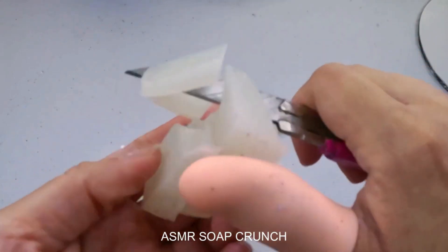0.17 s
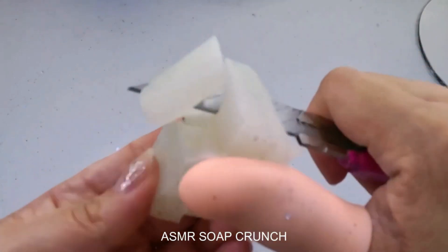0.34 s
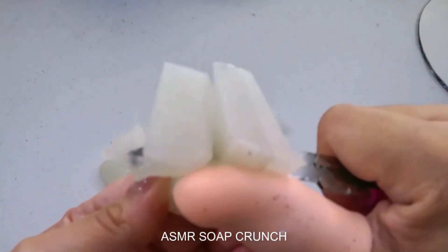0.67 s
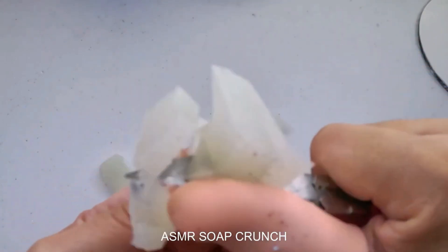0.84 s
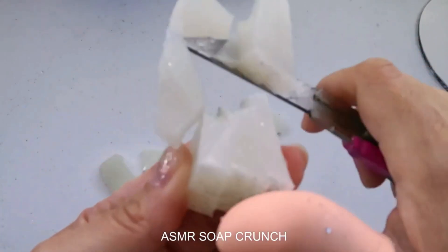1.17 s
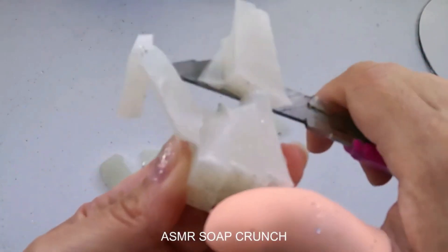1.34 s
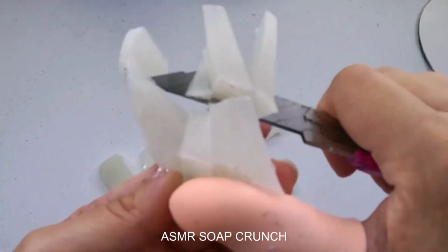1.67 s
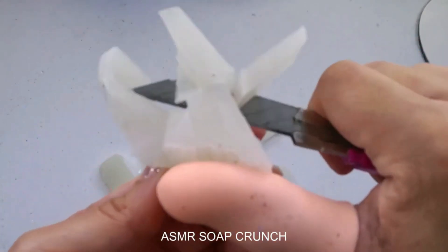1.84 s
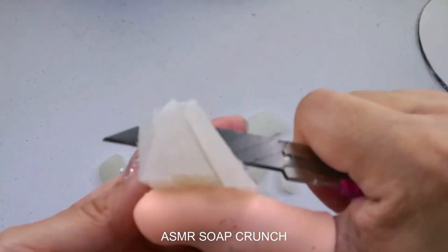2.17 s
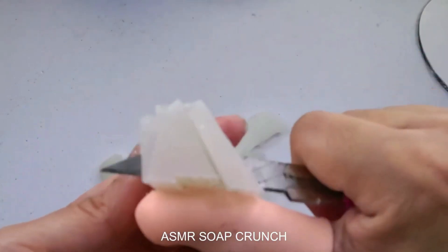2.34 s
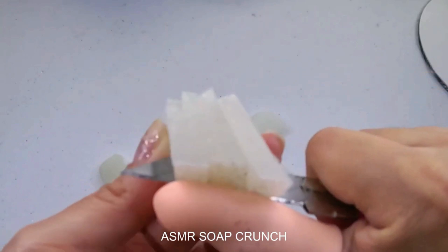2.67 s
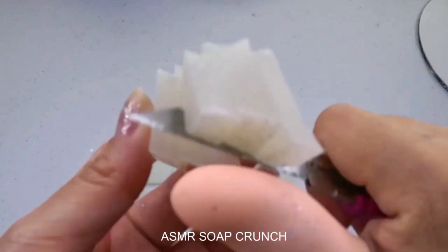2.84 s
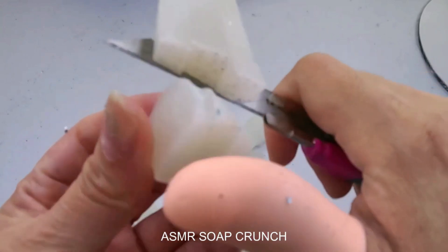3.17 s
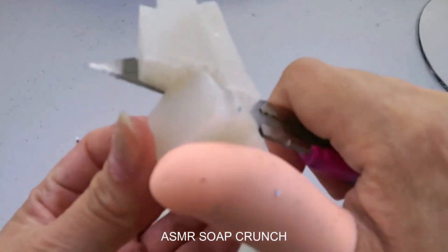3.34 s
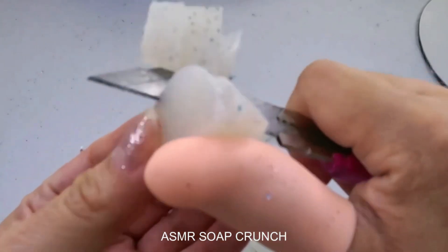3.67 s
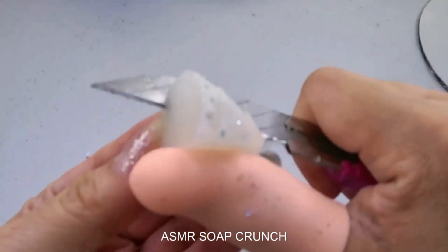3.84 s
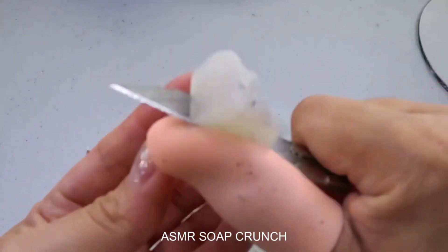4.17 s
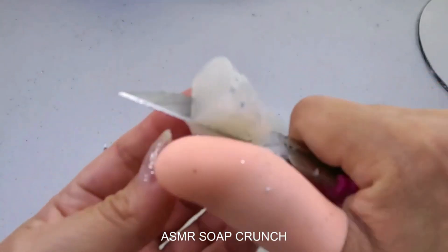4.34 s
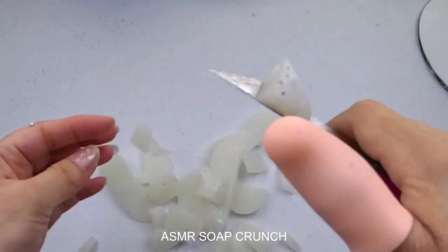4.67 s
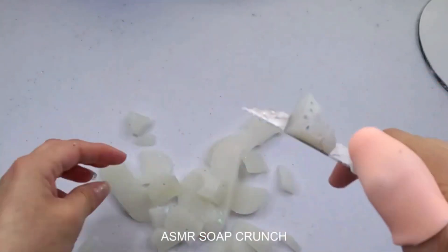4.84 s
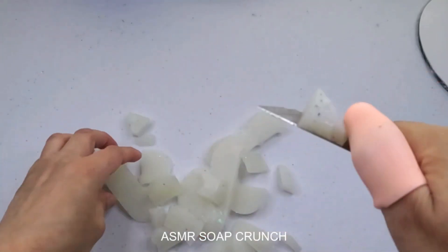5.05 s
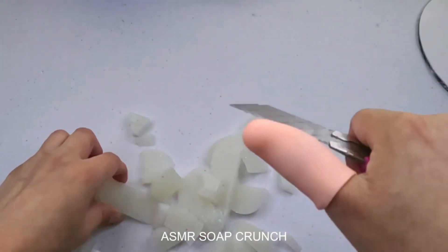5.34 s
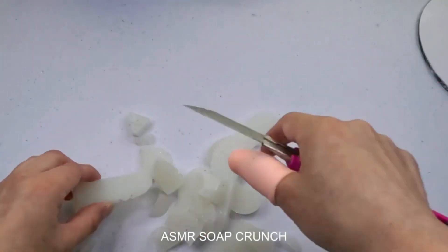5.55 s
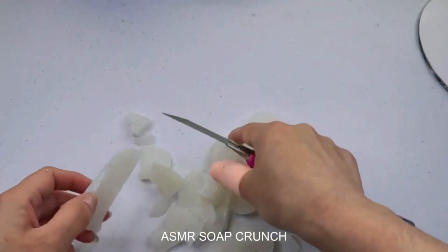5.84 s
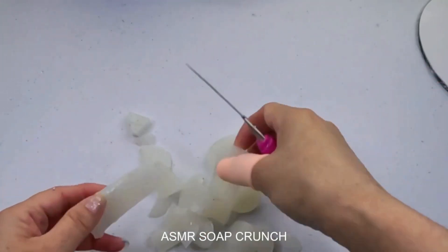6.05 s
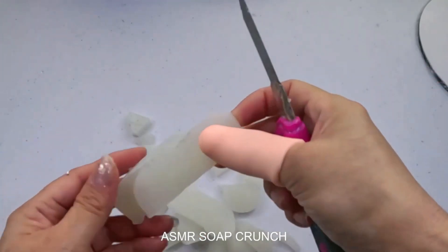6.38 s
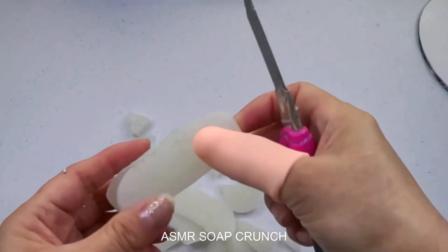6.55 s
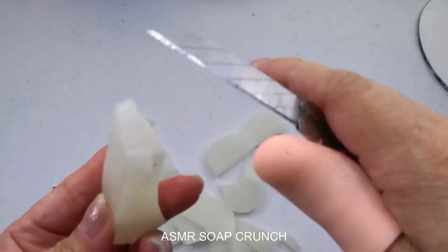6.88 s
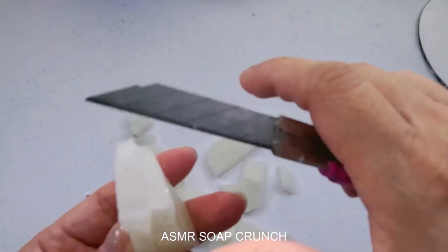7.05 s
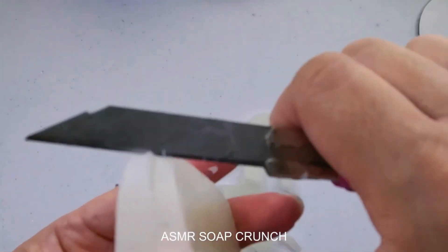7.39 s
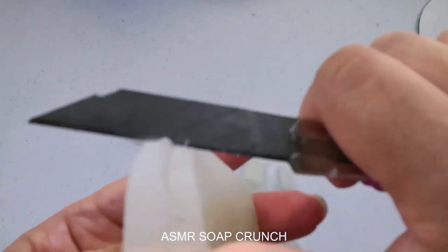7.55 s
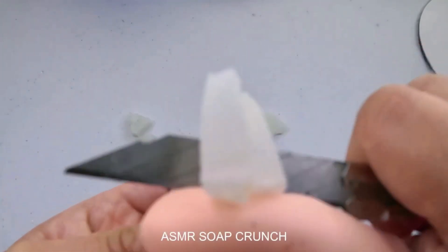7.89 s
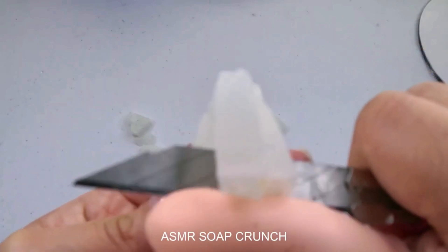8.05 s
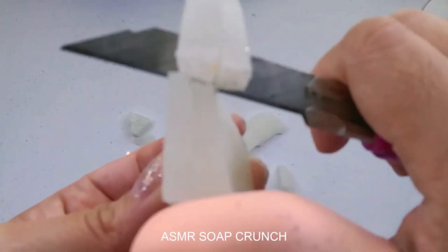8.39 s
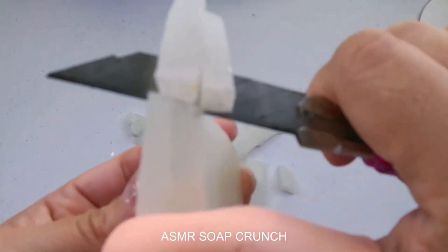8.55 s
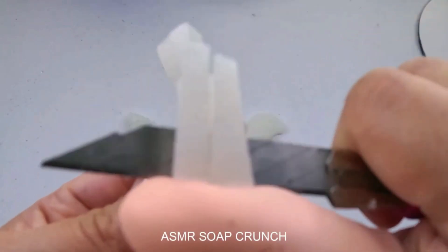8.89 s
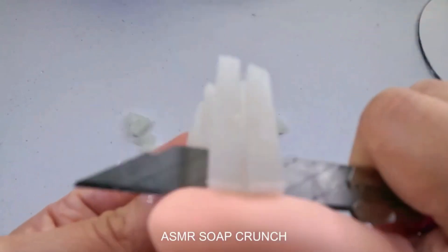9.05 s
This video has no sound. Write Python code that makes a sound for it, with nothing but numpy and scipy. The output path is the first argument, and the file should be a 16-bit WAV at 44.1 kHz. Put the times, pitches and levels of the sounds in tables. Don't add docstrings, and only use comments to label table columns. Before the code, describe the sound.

A low wavering traffic hum fills a small room. Over it come sharp dry snaps of tacky soap parting from a blade. Several heavy drops slam the hollow table, overloading the close microphone, followed by bounces and clacks. The background sinks after each blow and steadily climbs back. Later a hand shoves soap pieces with scrapes, chatter and thuds before light cutting resumes and one last piece drops.

```python
import sys
import numpy as np
from scipy import signal
from scipy.fft import rfft, irfft, next_fast_len
from scipy.io import wavfile

SR = 44100
rng = np.random.default_rng(int(sys.argv[2]) if len(sys.argv) > 2 else 0)


def volts_from_decibels(level):
    exponent = np.asarray(level, float) / 20
    return 10 ** exponent


def master(y):
    cut = np.clip(np.atleast_2d(y).T, -1, 1)
    pcm = np.round(cut * 32767)
    wavfile.write(sys.argv[1], SR, pcm.astype(np.int16))


N = 406602


def rms_one(x):
    return x / np.sqrt(np.mean(x ** 2) + 1e-20)


def in_time(rows):
    s, *columns = np.transpose(rows)
    return [np.interp(np.arange(N) / SR, s, column) for column in columns]


def while_on(rows, fade_s):
    start, end = rows[0][0], rows[-1][0]
    return np.interp(np.arange(N) / SR, [start - fade_s, start, end, end + fade_s], [0, 1, 1, 0])


def at_hz(points, hz):
    table_hz, values = np.array(points)[:, :2].T
    return np.interp(np.log(hz), np.log(table_hz), values)


def drift(rate):
    r = np.exp(-80 * np.pi * rate / SR)
    slow = signal.lfilter([1], [1, -2 * r, r * r], rng.standard_normal(N // 40 + 2002))[2000:]
    return np.interp(np.arange(N) / 40, np.arange(len(slow)), rms_one(slow))


def coloured(x, spectrum):
    size = next_fast_len(N)
    hz = np.arange(1, size // 2 + 2) * SR / size
    (low_hz, low_db), (high_hz, high_db) = spectrum[0], spectrum[-1]
    closed = [(low_hz / 2, low_db - 40)] + list(spectrum) + [(high_hz * 2, high_db - 40)]
    return rms_one(irfft(rfft(x, size) * volts_from_decibels(at_hz(closed, hz)), size)[:N])


def ring(clicks, hz, t60):
    r, w = volts_from_decibels(-60 / (t60 * SR)), 2 * np.pi * hz / SR
    return signal.lfilter([0, np.sin(w)], [1, -2 * r * np.cos(w), r * r], clicks + 1e-18)


def grains(per_s, spread_db):
    sizes = volts_from_decibels(spread_db * np.minimum(rng.exponential(1, N), 5)) * rng.choice([-1, 1], N)
    return sizes * (rng.random(N) < per_s / SR)


def place(times, peaks_db, sounds):
    out = np.zeros(N + sounds.shape[1])
    for s, peak_db, sound in zip(times, peaks_db, sounds):
        out[round(s * SR):][:len(sound)] += volts_from_decibels(peak_db) * sound / np.abs(sound).max()
    return out[:N]


def strokes(rows, rise_db_per_s, fall_db_per_s):
    t = np.arange(0, N + 32, 32) / SR
    gain = 0
    for s, held, db in rows:
        rise_db = rise_db_per_s * np.maximum(s - t, 0)
        fall_db = fall_db_per_s * np.maximum(t - s - held, 0)
        gain = gain + volts_from_decibels(db - rise_db - fall_db)
    return np.interp(np.arange(N) / SR, t, gain)


def struck(modes, times, peaks_db, contact_s, vary_db, crunch_s, crumble, size):
    chance = rng.standard_normal((len(times), len(modes)))
    fade = np.exp(-np.arange(size) / (crunch_s * SR)) * np.sqrt(2 / (crunch_s * SR))
    out = 0
    for k, (hz, mode_db, t60) in enumerate(modes):
        push = crumble * fade * rng.standard_normal((len(times), size))
        push[:, 0] += 1 - crumble
        out = out + volts_from_decibels(mode_db + vary_db * chance[:, k:k + 1]) * ring(push, hz, t60)
    soft = signal.butter(2, .4 / contact_s, fs=SR, output="sos")
    return place(times, peaks_db, signal.sosfilt(np.vstack([soft, soft]), out))


def snaps(times, peaks_db, low_hz, high_hz, decay_s):
    t, noise = np.arange(2048) / SR, rng.standard_normal((len(times), 2048))
    band = signal.butter(3, [low_hz, high_hz], "band", fs=SR, output="sos")
    onset = 1 - np.exp(-t / 0.00022)
    decay = np.exp(-t / decay_s) + .12 * np.exp(-t / (6 * decay_s))
    return place(times, peaks_db, signal.sosfilt(band, noise * onset * decay))


def ducking():
    from_db, share, recover_db_per_s, lag_s = -19.5, 0.35, 13, 0.077
    t, depth = np.arange(N) / SR, np.zeros(N)
    for s, *levels_db in DROPS + SHOVES:
        depth[round(s * SR)] = share * max(max(levels_db) - from_db, 0)
    held = np.maximum.accumulate(depth + recover_db_per_s * t) - recover_db_per_s * t
    r = np.exp(-1 / (lag_s * SR))
    return -signal.lfilter([1 - r], [1, -r], held)


# (f/Hz, level/dB per Hz)
DEEP = [(8.8, -33), (15, -5), (27, -8), (54, 3.5), (86, -5.5), (100, -16.5), (130, -14), (220, -120)]
RUMBLE = [(50, -17.5), (85, -13.5), (108, -3), (135, -3), (173, -6.5), (255, -10), (392, -19), (456, -28.5),
          (515, -26), (800, -57), (1040, -65), (1760, -120)]
TYRES = [(410, -19.5), (700, -1.5), (848, -6.5), (1020, 2.5), (1340, 1), (1630, -1), (1890, -7),
         (2800, -19.5), (3640, -52), (6160, -120)]
HISS = [(1470, -17.5), (2500, -3), (3020, 4), (3220, 2.5), (3680, -1), (7080, 2), (8420, -4.5),
        (14500, -19.5), (15900, -38), (16400, -38)]
# (t/s, level/dB)
TRAFFIC = [(0, -3), (.7, -0.5), (1.4, 1.5), (2.3, 2.5), (3.3, -2), (3.9, 1), (5.5, 2.5), (7.3, -2),
           (8.5, 1.5), (9.22, -0.5)]
# (t/s, level/dB)
GUSTS = [
    (0.698, -30.5),
    (3.9, -38.5),
    (5.5, -32.5),
    (8.35, -34),
    (9.0, -36.5),
]
# (t/s, held/s, level/dB)
PASSES = [
    (1.65, 0.2, -48),
    (3.75, 0.35, -54.5),
    (7.2, .6, -51.5),
]


def street_noise(duck_db):
    t, busy = np.arange(N) / SR, volts_from_decibels(in_time(TRAFFIC)[0])
    gusts = sum(volts_from_decibels(db) * np.exp(-((t - s) / 0.23) ** 2) for s, db in GUSTS)
    passing = strokes(PASSES, 14.5, 14.5)
    deep_gain = np.hypot(volts_from_decibels(-38.5), gusts)
    rumble_gain = volts_from_decibels(-29) * busy
    tyres_gain = np.hypot(volts_from_decibels(-53) * busy, passing)
    hiss_gain = volts_from_decibels(-63 + 0.29 * duck_db) * busy
    noise = 0
    for spectrum, gain, flicker_db in [(DEEP, deep_gain, 0.71), (RUMBLE, rumble_gain, 0.47),
                                       (TYRES, tyres_gain, 1.0), (HISS, hiss_gain, 1.0)]:
        flicker = volts_from_decibels(flicker_db * drift(10))
        noise = noise + gain * flicker * coloured(rng.standard_normal(N), spectrum)
    whine = rms_one(ring(rng.standard_normal(N), 7060, .1))
    return noise + hiss_gain * volts_from_decibels(-15) * whine


def tone(rows, wobble_hz, half_db):
    out = while_on(rows, fade_s=0.056)
    on = out > 0
    hz, level_db = in_time(rows)
    turn = 2 * np.pi * np.cumsum((hz + wobble_hz * drift(3))[on]) / SR
    level = np.sqrt(2) * volts_from_decibels((level_db + 2.6 * drift(6.3))[on])
    out[on] *= level * (np.sin(turn) + volts_from_decibels(half_db) * np.sin(turn / 2))
    return out


# (t/s, f/Hz, level/dB)
ENGINE_NEAR = [(0, 120, -40), (.8, 122.1, -29.5), (1.25, 119.8, -34), (2.2, 119, -20), (2.8, 117.7, -27.5),
               (3.2, 114.4, -21), (3.94, 113.5, -19), (4.85, 109.6, -24), (5.7, 108, -30)]
ENGINE_FAR = [(0, 137.5, -34), (.51, 139, -26), (1.05, 139, -30.5), (1.5, 139, -27.5), (2.199, 140.2, -33),
              (2.701, 138.5, -26), (3.199, 138, -38.5), (3.95, 138, -28.5)]
ENGINE_LATE = [(6.72, 125.1, -41), (6.8, 127.6, -28.5), (7.3, 128, -29.5), (7.87, 125.9, -32),
               (8.74, 122.8, -31), (8.93, 123, -19), (9.19, 119.7, -39.5)]
ENGINE_FADING = [(6.72, 123.7, -44), (6.8, 123.1, -29.5), (7.3, 121, -36), (7.8, 119.6, -31.5),
                 (8.0, 118.1, -52)]


def engines():
    passing = [ENGINE_NEAR, ENGINE_FAR, ENGINE_LATE, ENGINE_FADING]
    return sum(tone(rows, wobble_hz=0.38, half_db=-20.0) for rows in passing)


# (start t/s, loudest t/s, end t/s, f/Hz, level/dB)
DRONES = [
    (0, 0.79, 1.624, 248, -33.5),
    (1.85, 1.5, 2, 249, -26.5),
    (2.6, 3.3, 3.95, 250.3, -31.5),
    (7.2, 9, 8.9, 248, -34),
    (0, 1.21, 1.9, 313, -32),
    (2.85, 2, 3.95, 312, -37),
    (2.9, 3.44, 3.95, 193.2, -36),
    (3.3, 3.5, 4.3, 377, -41),
]


def drones():
    swell_db = 11.5
    out = 0
    for start, top, end, hz, db in DRONES:
        rows = [(start, hz, db - swell_db), (top, hz, db), (end, hz, db - swell_db / 2)]
        out = out + tone(rows, wobble_hz=1.472, half_db=-18.0)
    return out


def growl():
    band = signal.butter(4, [400, 610], "band", fs=SR, output="sos")
    level = strokes([(1.6, 0, -44.5)], rise_db_per_s=6, fall_db_per_s=12)
    return level * volts_from_decibels(0.63 * drift(7.1)) * rms_one(signal.sosfilt(band, rng.standard_normal(N)))


def street():
    duck_db = ducking()
    return volts_from_decibels(duck_db) * (street_noise(duck_db) + engines() + drones() + growl())


# (t/s, dull level/dB, bright level/dB)
TICKS = [(.177, -55, -47.5), (0.9455, -37, -23), (.983, -51, -35), (1.1308, -50, -37), (1.1797, -49.5, -45),
         (1.2188, -34, -40), (1.5692, -31, -33.5), (1.84, -47, -33.5), (1.897, -42.5, -36),
         (2.775, -59, -26), (2.804, -30, -22.5), (2.8354, -46, -39), (2.9577, -61, -41), (2.9755, -57, -30),
         (2.945, -56, -39), (8.232, -45, -45), (4.324, -50, -33.5), (4.376, -22.5, -17), (4.481, -42, -41),
         (4.776, -38, -52), (5.3143, -32, -46), (5.4766, -32.5, -37), (4.862, -35, -60), (5.28, -46, -52),
         (5.642, -37, -46), (7.0694, -49, -37), (7.4695, -39, -65), (8.1466, -36.5, -35), (8.311, -36, -33),
         (8.5654, -39, -43.5), (8.998, -29, -38), (4.457, -50, -50), (1.2195, -38, -60), (9.201, -36, -50),
         (9.213, -34, -24), (3.31, -40, -50), (5.688, -50, -44)]


def ticks():
    s, dull_db, bright_db = np.transpose(TICKS)
    dull = snaps(s, dull_db, low_hz=1900, high_hz=4600, decay_s=0.0022)
    bright = snaps(s, bright_db - 1.5, low_hz=5400, high_hz=10800, decay_s=0.0018)
    return dull + bright


# (t/s, held/s, level/dB)
SLIDES = [(.945, 0.014, -50.5), (1.14, 0.1, -54.5), (1.52, 0.063, -64), (1.84, 0.18, -61.5),
          (2.78, 0.057, -53.5), (2.94, 0.14, -63.5), (3.31, 0.021, -62), (3.69, .03, -59.5),
          (4.0, 0.028, -59), (4.37, 0.062, -56), (4.71, 0.13, -65), (6.23, 0.012, -64), (6.78, 0.07, -59.5),
          (7.06, 0.066, -62), (7.88, .02, -58.5), (8.14, 0.054, -59.5), (8.23, 0.13, -58.5),
          (8.75, 0.036, -60), (8.87, 0.031, -57), (5.305, 0.035, -60), (5.48, 0.02, -63)]
# (f/Hz, level/dB per Hz)
TACK = [(2500, 2), (4500, -3), (6500, 1.5), (9000, 2), (11000, -7), (14000, -33), (16000, -32)]


def crackle():
    slips = grains(per_s=3700, spread_db=0.0) * volts_from_decibels(3.2 * drift(30))
    return coloured(slips, TACK) * strokes(SLIDES, 397, 241.5)


# (t/s, held/s, level/dB)
SMEARS = [
    (1.21, .02, -53),
    (1.57, 0.015, -51.5),
    (2.98, 0.033, -55),
    (3.325, 0.022, -45),
    (4.38, 0.015, -52),
    (4.88, .03, -52),
]


def smears():
    return rms_one(ring(grains(per_s=1300, spread_db=3.5), 2970, 0.0019)) * strokes(SMEARS, 900, 500)


# (t/s, table boom level/dB, knock level/dB, clack level/dB, crack level/dB)
DROPS = [(2.271, -31.5, -42, -30, -55), (2.2776, 0, -8, -40.5, -41), (2.283, -9.5, -19, -12, -36),
         (2.302, 0, -30, -24.5, -36.5), (2.351, -9, -15, -21.5, -38), (2.403, -23, -18, -16, -40),
         (3.311, -18, -31, -38, -43), (3.9943, -22, -40, -34, -48), (3.999, -3, -12, -27, -40),
         (4.036, -5, -15, -24, -50), (4.185, -20.5, -43, -46.5, -66), (4.325, -7, -41, -48, -52),
         (4.8715, -3, -13, -10, -7), (4.886, -3, -29.5, -18, -45), (4.899, -19, -21, -37, -20),
         (4.936, -25, -24.5, -33, -42), (4.984, -28, -29, -23.5, -34.5), (5.025, -17, -38, -37, -56),
         (9.211, -10, -29, -31, -31), (9.2165, -11, -24.5, -27, -28)]
SHOVES = [(5.236, -7.5, -47, -26, -34.5), (5.363, -11, -50, -35, -60), (5.531, -33, -47, -33, -57),
          (5.339, -30, -50, -34, -45), (5.55, -18, -39.5, -31, -51), (5.5602, -3, -20, -9, -15),
          (5.598, -7, -43, -44.5, -60), (5.617, -3, -13.5, -27, -43), (5.676, -8, -24, -31, -42),
          (5.722, -22, -18, -16.5, -43.5), (6.059, -15, -22, -34, -70), (6.074, -15, -30, -40, -66),
          (6.094, -10.5, -35, -36, -70), (6.104, -12.5, -33, -34, -64), (6.202, -16, -35, -54, -60),
          (6.318, -23, -61, -39, -67), (6.338, -4.5, -59, -41, -52), (6.3548, -4, -27, -10, -43),
          (6.377, -3, -22, -37, -49), (6.404, 2.5, -9.5, -13, -22), (6.442, -7, -7, -7.5, -32)]


def landings():
    s, *levels_db = np.transpose(DROPS + SHOVES)
    return s + .001, *levels_db


# (f/Hz, level/dB, t60/s)
TABLE = [(110, -23.5, 0.17), (165.8, 4, 0.2), (185, -18, 0.36), (215.3, -1.5, 0.13), (255, -1, 0.041),
         (259, 4, 0.076), (305, 8, 0.15), (327, -10, 0.031)]
PUSH = [(147, 0, 0.059)]
THUMP = [(374, -2, 0.14), (457, 1.5, 0.049), (539, 2.5, 0.032), (619.5, -8, 0.21)]


def table_boom():
    s, boom_db, knock_db, _, _ = landings()
    boom = struck(TABLE, s, boom_db - 1.0, contact_s=0.00068, vary_db=3.5,
                  crunch_s=0.0027, crumble=0.3, size=8192)
    lurch = struck(PUSH, s, 1.5 * boom_db - 12.0, contact_s=0.0013, vary_db=0,
                   crunch_s=0.0036, crumble=0.11, size=2048)
    thump = struck(THUMP, s, .6 * knock_db + .4 * boom_db - 5.0, contact_s=0.00052, vary_db=3,
                   crunch_s=0.005, crumble=0.55, size=4096)
    return thump - boom - lurch


# (f/Hz, level/dB, t60/s)
KNOCK = [(720, -2, .015), (880, -2, .012), (1060, 0, .02), (1200, -2, .012), (1380, -3, .01)]
CLACK = [(1550, -3, 0.0068), (1800, 1.5, .009), (2050, -1, 0.0076), (2470, -3.5, .004), (2980, -10.5, .004),
         (3700, -14.5, 0.0034), (4600, -19.5, .002)]


def piece_clatter():
    s, _, knock_db, clack_db, crack_db = landings()
    knock = struck(KNOCK, s, knock_db + 2.0, contact_s=0.00024, vary_db=-2.5,
                   crunch_s=0.0036, crumble=0.65, size=2048)
    clack = struck(CLACK, s, clack_db + 5.0, contact_s=.0001, vary_db=1.0,
                   crunch_s=0.0024, crumble=0.74, size=2048)
    crack = snaps(s, crack_db + 6, low_hz=2300, high_hz=7000, decay_s=.0012)
    return knock + clack + crack


# (t/s, level/dB, f/Hz)
SLAMS = [
    (2.2785, 12, 207),
    (3.9973, 11, 175),
    (4.8733, 12, 190),
    (6.404, 1, 200),
    (5.561, 0, 240),
]


def table_slams():
    s, level_db, pitches = np.transpose(SLAMS)
    weight = signal.lfilter(np.hanning(40), 1, np.eye(1, 8192))
    return place(s, level_db, np.vstack([-ring(weight, hz, .024) for hz in pitches]))


# (t/s, level/dB, f/Hz, t60/s)
RINGS = [(2.284, -6, 1790, .025), (2.29, -10, 309, .2), (2.301, -16, 1900, .015), (2.352, -18, 1800, .02),
         (4.037, -12, 1940, .018), (4.04, -12, 307, .15), (5.5615, -5, 2050, .02), (5.564, -15, 308, .1),
         (5.6175, -16, 1100, .07), (5.619, -12, 308, .12), (5.678, -9, 330, .045), (5.722, -21, 2160, .02),
         (5.2365, -24, 1900, .02), (5.316, -30, 1850, .03), (6.271, -38, 1900, .02),
         (6.32, -34, 1600, .015), (6.0605, -24, 1900, .03), (6.357, -8, 1800, .02), (6.379, -12, 308, .12),
         (6.406, -12, 308, .1), (6.4435, -7, 1780, .025), (6.445, -12, 1100, .04)]


def clear_rings():
    s, level_db, pitches, t60s = np.transpose(RINGS)
    click = np.eye(1, 8192)
    sounds = [ring(ring(click, hz, 4.0 / hz), hz, t60) for hz, t60 in zip(pitches, t60s)]
    return place(s, level_db, np.vstack(sounds))


# (t/s, held/s, level/dB)
CRUMBS = [(2.288, .03, -38), (2.358, .02, -44), (4.008, .015, -38), (4.045, 0.017, -39), (4.89, .035, -38),
          (6.062, 0.0068, -34), (6.093, .016, -41), (6.365, 0.027, -38), (6.45, 0.015, -36),
          (5.57, 0.032, -37), (5.727, .02, -38), (5.685, .015, -38), (2.41, .01, -36)]
# (f/Hz, level/dB per Hz)
CRUMB = [(600, -6), (1000, 2.5), (1400, -3), (1850, 3), (2400, -10), (3200, -26)]


def crumbs():
    return coloured(grains(per_s=2500, spread_db=1.5), CRUMB) * strokes(CRUMBS, 1500, 400)


# (t/s, level/dB)
THUDS = [(5.029, -14), (5.035, -18), (5.047, -23), (6.062, -13), (6.068, -20), (6.073, -14.5),
         (6.086, -17.5), (6.095, -14), (6.105, -14.5), (6.118, -20.5), (6.205, -21.5), (6.237, -25),
         (6.272, -26), (6.322, -16), (4.327, -18), (6.415, -14.5), (6.458, -16), (2.291, -8),
         (2.313, -11.5), (2.367, -17), (4.012, -11.5)]


def thuds():
    s, level_db = np.transpose(THUDS)
    return struck(THUMP, s, level_db, contact_s=0.00072, vary_db=3.0, crunch_s=0.002, crumble=0.33, size=2048)


# (t/s, level/dB)
SWAY = [
    (3.99, -22),
    (5.4, -21),
]


def sway():
    rocking = rms_one(ring(rng.standard_normal(N), 29.6, .6))
    return rocking * strokes([(s, 0, db) for s, db in SWAY], 141, 53)


# (t/s, held/s, level/dB)
RASPS = [
    (5.238, .006, -52),
    (5.294, .045, -55),
    (5.41, .11, -61),
    (6.228, .02, -63),
]
# (f/Hz, level/dB per Hz)
RASP = [(2200, -6), (3000, 2), (5000, 1), (7500, -5), (10000, -16)]


def rasps():
    return coloured(grains(per_s=4000, spread_db=2.5), RASP) * strokes(RASPS, 698, 698)


# (t/s, held/s, level/dB)
DRAG = [
    (5.24, 0.034, -50.5),
    (5.3, .025, -43),
    (5.36, .11, -44.5),
    (5.49, .03, -53.5),
    (6.07, 0.026, -44.5),
    (6.225, 0.022, -49),
    (6.265, 0.0073, -54),
    (6.32, .03, -63),
]
# (t/s, held/s, level/dB)
TIPS = [
    (5.33, .028, -44),
    (5.531, .006, -46),
    (5.55, .004, -42),
]


def drag():
    slips = grains(per_s=5000, spread_db=2) * volts_from_decibels(3.0 * drift(40))
    body = ring(slips, 1870, 0.0074) + 0.5 * ring(slips, 2173, 0.0019) + 0.26 * ring(slips, 1200, 0.004)
    chatter = rms_one(ring(slips, 2600, .003))
    return rms_one(body) * strokes(DRAG, 505, 505) + chatter * strokes(TIPS, 900, 600)


# (t/s, held/s, level/dB)
LEANS = [
    (5.38, 0.22, -23.5),
    (6.22, .1, -22),
]


def lean():
    return coloured(rng.standard_normal(N), RUMBLE) * strokes(LEANS, 120, 100)


# (f/Hz, t60/s)
ROOM = [(100, 0.23), (1000, 0.29), (3000, 0.23), (10000, 0.063)]


def room(x):
    t, edges = np.arange(SR // 2) / SR, 70 * 2 ** np.arange(0, 8.1, .5)
    tail = 0
    for low, high in zip(edges, edges[1:]):
        band = signal.butter(2, [low, high], "band", fs=SR, output="sos")
        noise = signal.sosfilt(band, rng.standard_normal(len(t)))
        tail = tail + noise * volts_from_decibels(-60 * t / at_hz(ROOM, np.sqrt(low * high)))
    tail = tail * (1 - np.exp(-t / 0.0011))
    return signal.fftconvolve(x, tail / np.sqrt(np.sum(tail ** 2)))[:N]


def air(x):
    edges, white = 500 * 2 ** np.arange(0, 4.1, .5), rng.standard_normal((2, N))
    build = np.exp(-1 / (0.0031 * SR))
    out = 0
    for k, (low, high) in enumerate(zip(edges, edges[1:])):
        band = signal.butter(2, [low, high], "band", fs=SR, output="sos")
        heard, noise = signal.sosfilt(band, [x + 1e-18, white[k % 2]])
        keep = volts_from_decibels(-120 / (at_hz(ROOM, np.sqrt(low * high)) * SR))
        linger = np.convolve([1, -keep], [1, -build])
        power = signal.lfilter([(1 - keep) * (1 - build)], linger, heard ** 2)
        out = out + np.sqrt(np.abs(power)) * rms_one(noise)
    return out


def scene():
    cutting = ticks() + crackle() + smears()
    boom = table_boom() + thuds()
    near = cutting + piece_clatter() + clear_rings() + crumbs() + rasps() + drag()
    near = signal.sosfilt(signal.butter(2, 13500, fs=SR, output="sos"), near)
    echoes = volts_from_decibels(-15) * air(near) + volts_from_decibels(-13.5) * room(boom)
    return (street() + near + boom + table_slams() + sway() + lean() + echoes)[None]


def band_limit(x):
    return signal.sosfilt(signal.butter(12, 16600, fs=SR, output="sos"), x)


def record(dry):
    mix = np.clip(dry, -.98, .99)
    return band_limit(mix)


dry = scene()
out = record(dry)
master(out)
```